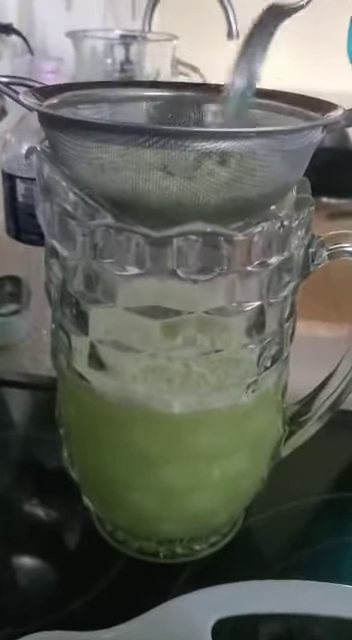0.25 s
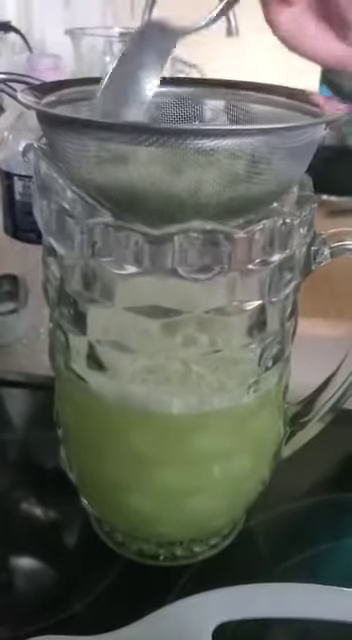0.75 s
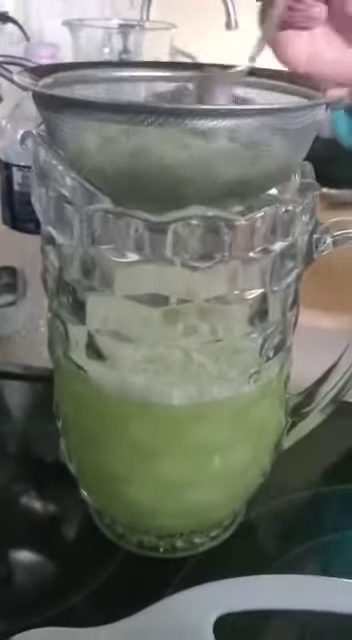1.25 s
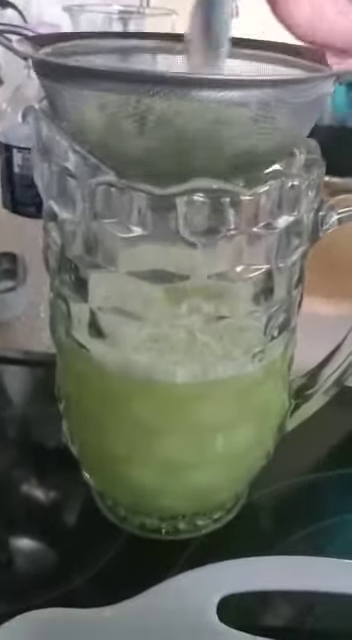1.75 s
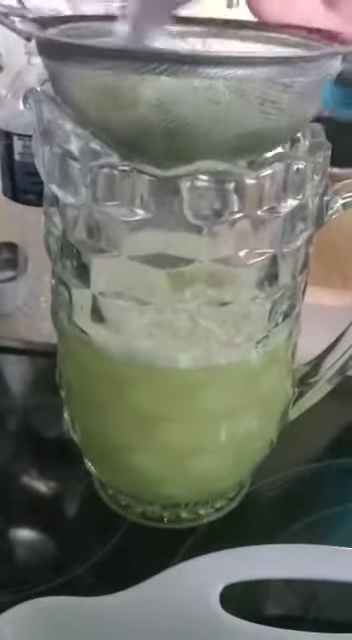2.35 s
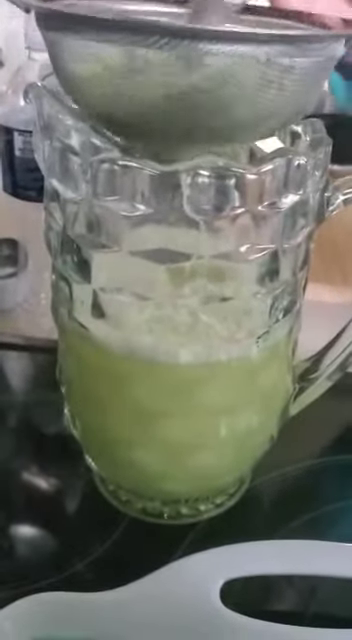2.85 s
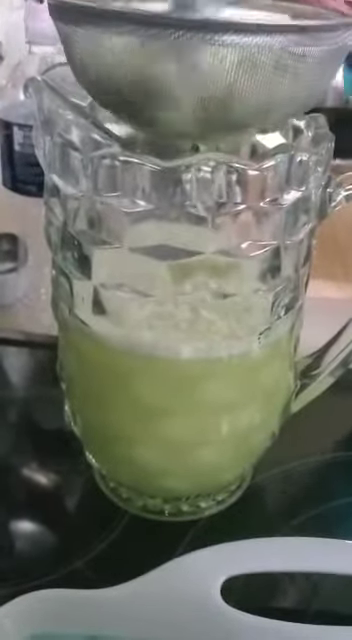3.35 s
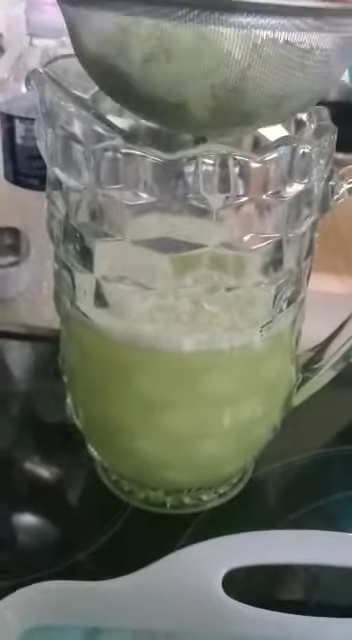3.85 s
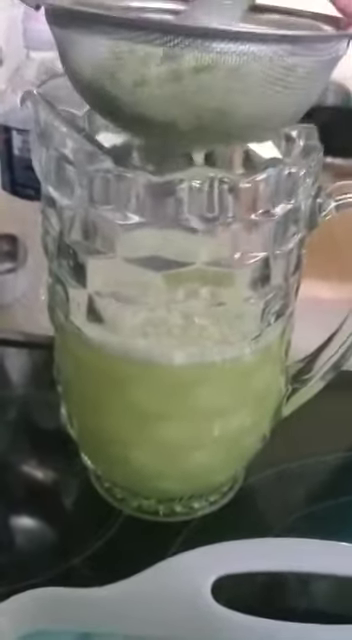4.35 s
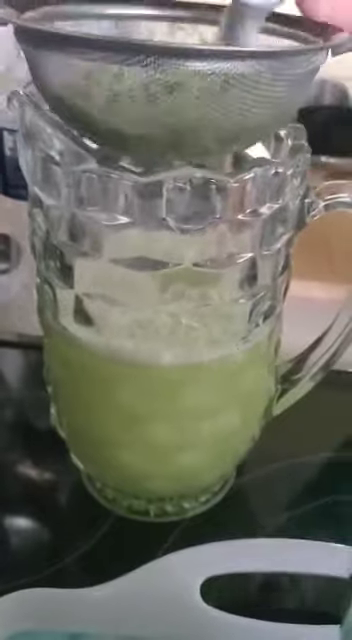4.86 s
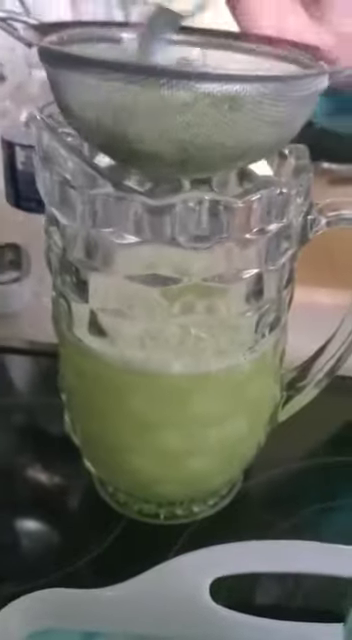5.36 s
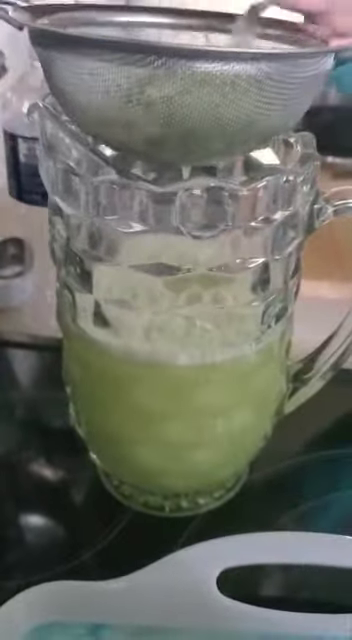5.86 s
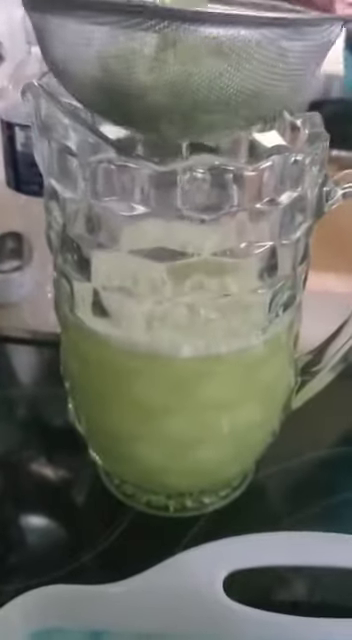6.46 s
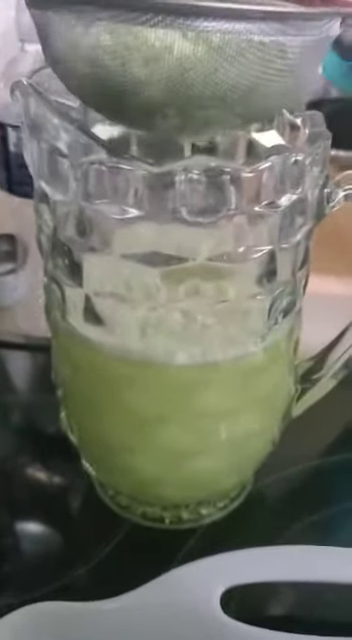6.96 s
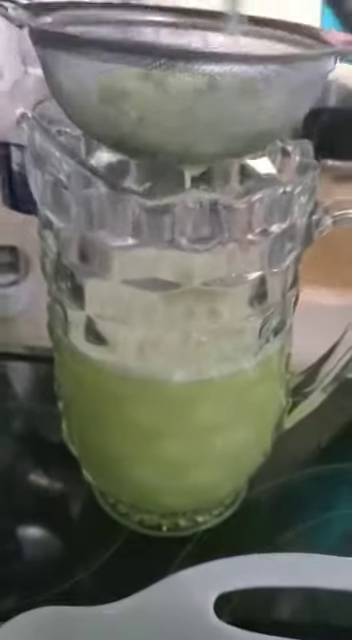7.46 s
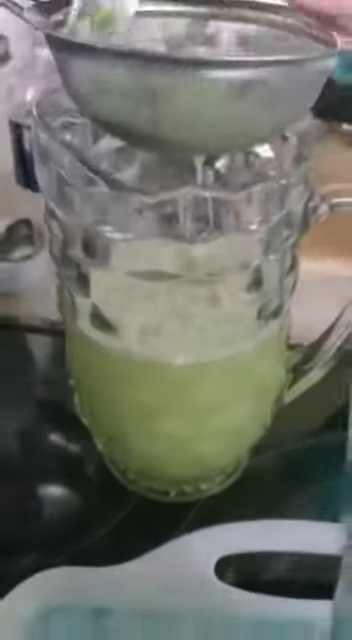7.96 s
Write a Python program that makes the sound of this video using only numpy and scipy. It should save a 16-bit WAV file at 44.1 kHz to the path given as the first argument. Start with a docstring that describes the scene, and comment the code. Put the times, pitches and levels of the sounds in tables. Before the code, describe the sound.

Raspy spoon strokes on fine metal mesh, light metallic ticks, soft pulpy fizz and plinking juice drips in a glass pitcher, close in a kitchen.

```python
"""A spoon works wet pulp through a wire strainer that rests on a glass pitcher, close by in a small kitchen.
From the start the pulp fizzes as foam bursts, and pushes rumble in the counter; a thin whistle soon droops.
Then come firm strokes, whose snaps over the wires rasp and make the strainer hum. Later the spoon ticks on
the metal, knocks ring the air in the pitcher, and juice falls in as drips made of short rising bubble tones.
From mid-scene thin runs of juice join in, and later the spoon strikes the rim once with a chattering clink."""
import sys
import numpy as np
from scipy import signal
from scipy.fft import next_fast_len
from scipy.io import wavfile
from scipy.ndimage import uniform_filter1d

SR = 44100
rng = np.random.default_rng(int(sys.argv[2]) if len(sys.argv) > 2 else 0)


def transcribe(u):
    """Save the signal u as a 16-bit wav file named by the first command-line argument.

    u: samples, shape (n,) or (channels, n), limited to [-1, 1]; the rate is SR.
    q: integer samples, one column per channel.
    """
    v = np.clip(np.atleast_2d(u).T, -1, 1)
    q = np.round(v * 32767).astype(np.int16)
    wavfile.write(sys.argv[1], SR, q)


N = 362042
TIME = np.arange(N) / SR
GRID = np.fft.rfftfreq(8192, 1 / SR)  # filter frequencies, Hz
EAR_DELAY = 10  # samples by which the right microphone hears direct sound later


def gain_of(db):
    """Logarithmic level: decibels to amplitude."""
    return 10 ** (np.asarray(db) / 20)


def evened(x):
    """Power normalisation: scales to rms 1."""
    return x / np.sqrt(np.mean(x ** 2) + 1e-20)


def read(points, hz=GRID):
    """Spectral interpolation: reads a table on a log-frequency axis."""
    f, value = np.transpose(points)
    return np.interp(np.log(hz + 1), np.log(f + 1), value)


def add(mix, s, sound):
    """Superposition: mixes a two-channel sound in at s seconds."""
    part = mix[:, max(round(s * SR), 0):][:, :sound.shape[1]]
    part += sound[:, :part.shape[1]]


def colour(x, db):
    """Minimum-phase filtering: a causal filter with the given gain on GRID, along the last axis."""
    half = np.log(gain_of(np.maximum(db, -100)))
    mirrored = np.r_[half, half[-2:0:-1]]
    # the Hilbert transform of the log gain supplies the phase
    taps = np.fft.ifft(np.exp(np.conj(signal.hilbert(mirrored)))).real
    taps = np.array(taps[:len(half)], ndmin=x.ndim)
    return signal.oaconvolve(x, taps, axes=-1)[..., :x.shape[-1]]


def wander(per_s):
    """Slow random modulation: straight lines between per_s random values a second, of rms 1."""
    knots = rng.standard_normal(N // 8)
    return evened(np.interp(TIME * per_s, np.arange(len(knots)), knots))


def spread(three, diffuse_db):
    """Partial coherence: one signal reaches both microphones, the other two are scattered sound."""
    direct = np.array([three[0], np.roll(three[0], EAR_DELAY)])
    return evened(direct + gain_of(diffuse_db) * three[1:])


def noise(diffuse_db):
    """Broadband excitation: white noise at the two microphones."""
    return spread(rng.standard_normal((3, N)), diffuse_db)


def crackle(per_s, spread_db, diffuse_db):
    """Impulsive excitation: random tiny clicks of uneven size at the two microphones."""
    boost_db = spread_db * np.minimum(rng.exponential(1, (3, N)), 4)
    size = rng.standard_normal((3, N)) * gain_of(boost_db)
    happens = rng.random((3, N)) < per_s / SR
    return spread(size * happens, diffuse_db)


def ring(modes, t):
    """Modal vibration: exponentially dying sines of a struck thing."""
    return sum(gain_of(db - 60 * t / t60) * np.sin(2 * np.pi * (hz * t + rng.random()))
               for hz, db, t60 in modes)


def placed(x, echo_db, echo_s):
    """Early reflection: each sound gets its own quick reflections off glass and steel."""
    t = TIME[:SR // 16]
    paths = rng.standard_normal((2, len(t))) * np.exp(-t / echo_s)
    paths *= gain_of(echo_db) / np.linalg.norm(paths[0])
    paths[[0, 1], [0, EAR_DELAY]] += 1  # direct sound
    return signal.fftconvolve(x[None], paths / np.linalg.norm(paths[0]), axes=1)


def gestures(start, length, db, lean_db, attack_s, fade_db_per_s, arch_db=0):
    """Amplitude envelope: each movement sets in, holds with a lean and an arch, then dies away."""
    t = TIME[::32]
    age = t[:, None] - start
    along = np.clip(age / length, 0, 1)
    level = db + lean_db * (along - .5) - arch_db * (2 * along - 1) ** 2
    level = level - fade_db_per_s * np.maximum(age - length, 0)
    each = np.clip(age / attack_s, 0, 1) * gain_of(level)
    return np.interp(TIME, t, np.linalg.norm(each, axis=1))  # overlapping movements add in power


# decay of the kitchen's reflections: [frequency_hz, t60_s]
KITCHEN_DECAY = [(200, 0.28), (600, 0.29), (2500, 0.29), (8000, 0.22), (16000, 0.2)]


def kitchen(x, room_db):
    """Reverberation: walls add sparse reflections, each band dying at its own speed."""
    t = TIME[:SR // 2]
    taps = rng.standard_normal((2, len(t))) * (rng.random((2, len(t))) < .12) * (t > .006)
    hz, when, bands = signal.stft(taps, SR, nperseg=256)
    decay = gain_of(-60 * when / read(KITCHEN_DECAY, hz)[:, None])
    tail = signal.istft(bands * decay, SR, nperseg=256)[1]
    tail = tail / np.linalg.norm(tail[0])
    return x + gain_of(room_db) * signal.oaconvolve(x, tail, axes=1)[:, :N]


# spectrum of the steady background: [frequency_hz, relative level_db]
QUIET_SPECTRUM = [(15, -46), (25, -10.5), (70, -5.5), (166, 0), (326, -2), (796, -10.5), (4490, -15.5),
                  (9070, -22), (10400, -26), (12200, -4.5), (16000, -29.5)]
QUIET_DB = -76.5


def quiet():
    """Stationary noise: a steady background, partly shared by both microphones."""
    return gain_of(QUIET_DB) * evened(colour(noise(diffuse_db=3), read(QUIET_SPECTRUM)))


# pushes on the pitcher: [start_s, length_s, relative level_db]
PUSHES = [(0.0, 0.37, -70), (0.404, 0.23, -61), (0.825, 0.11, -51.5), (1.228, 0.29, -55.5),
          (1.597, 0.14, -49), (1.965, 0.14, -53.5), (2.395, 0.037, -48), (3.442, .12, -53),
          (3.786, 0.089, -68), (5.984, 0.72, -70), (6.948, 0.08, -64.5), (7.706, 0.43, -62)]
PUSH_ATTACK_S, PUSH_SAG_DB, SHAKE_FADE_DB_PER_S = 0.026, -5.5, 115
TREMOR_DB = -75.5  # relative level; the hand that holds the strainer is never quite still
# spectrum of the shaken counter: [frequency_hz, relative level_db]
RUMBLE_SPECTRUM = [(13, -61), (22, -30), (48, -1), (65, 0), (113, -9.5), (177, -25.5), (299, -27.5),
                   (337, -28), (372, -27), (400, -20), (520, -64), (880, -120)]
# soft low bumps: [start_s, relative level_db, length_s]
BUMPS = [(1.596, -54.5, 0.075), (4.704, -64.5, 0.097), (7.733, -69.5, 0.19), (7.874, -51.5, 0.003),
         (8.025, -49, 0.0025)]
# spectrum of a bump: [frequency_hz, relative level_db]
BUMP_SPECTRUM = [(20, -82), (70, 12.5), (250, 6), (500, 2), (1000, -25), (4000, -22.5)]


def counter(rumble_db=0, bump_db=-2):
    """Structure-borne sound: the pushed pitcher shakes the counter."""
    push = gestures(*np.transpose(PUSHES), PUSH_SAG_DB, PUSH_ATTACK_S, SHAKE_FADE_DB_PER_S)
    push = np.hypot(push, gain_of(TREMOR_DB))
    shake = colour(noise(diffuse_db=-5.5), read(RUMBLE_SPECTRUM))
    shake = signal.hilbert(shake, next_fast_len(N))[:, :N]
    shake = evened(shake.real / (abs(shake) + 1e-9) ** 0.19)  # slightly flattened envelope
    thud = evened(colour(noise(diffuse_db=-23), read(BUMP_SPECTRUM)))
    start, db, length = np.transpose(BUMPS)
    bump = gestures(start, length, db, lean_db=-4.5, attack_s=0.0041, fade_db_per_s=1500)
    return gain_of(rumble_db) * shake * push + gain_of(bump_db) * thud * bump


# thin falling whistles: [start_s, relative level_db]
WHISTLES = [(0.259, -69.5), (.67, -70.5), (3.675, -72), (4.09, -68), (4.49, -69)]


def whistling(start_hz=3600, fall_hz=400, length_s=0.19, fuzz_per_s=450, whistle_db=0):
    """Narrow-band noise: a randomly modulated tone droops ever faster and fades."""
    out, t = np.zeros((2, N)), TIME[:SR // 4]
    pitch = start_hz - fall_hz * np.minimum(t / length_s, 1.2) ** 2
    shape = np.minimum(t / 0.0028, 1) * np.exp(-(t / length_s) ** 3)
    for s, db in WHISTLES:
        fuzz = (wander(fuzz_per_s) + 1j * wander(fuzz_per_s))[:len(t)]
        tone = fuzz * np.exp(2j * np.pi * np.cumsum(pitch) / SR)
        add(out, s, gain_of(db + whistle_db) * placed(tone.real * shape, echo_db=6.5, echo_s=0.057))
    return out


# the strainer knocks on the pitcher: [start_s, relative level_db]
KNOCKS = [(1.195, -54), (1.254, -57), (2.215, -66), (3.762, -62), (4.93, -60), (6.428, -58.5), (7.329, -58)]
# air modes in the pitcher: [frequency_hz, relative level_db, t60_s]
CAVITY_MODES = [(407, 3, 0.21), (540, -28, 0.064), (860, -4, 0.15), (1352, -1, 0.18)]


def knocking(knock_db=-5, soft_s=0.00091):
    """Cavity resonance: wet, cushioned knocks ring the air in the pitcher."""
    out, t = np.zeros((2, N)), TIME[:SR // 4]
    cushion = 1 - np.exp(-t / soft_s)
    for s, db in KNOCKS:
        knock = ring(CAVITY_MODES, t) * cushion
        add(out, s, gain_of(db + knock_db) * placed(knock, echo_db=-8, echo_s=0.0033))
    return out


# thin runs of juice: [start_s, length_s, relative level_db, central pitch_hz]
DRIBBLE = [(4.446, .24, -77, 2630), (6.081, .05, -60, 4830), (7.229, .28, -63, 2330),
           (7.354, 0.39, -59.5, 5550), (7.721, .49, -63.5, 1927)]
DRIBBLE_PER_S, DRIBBLE_SPREAD_DB = 19, 7
DRIBBLE_PITCH_SPREAD = 0.35  # full range of log pitch


def dribble():
    """Jittered periodic release: runs of juice break into drops of start_s, level_db, pitch_hz."""
    drops = []
    for start, length, db, hz in DRIBBLE:
        turn = np.arange(0, length, 1 / DRIBBLE_PER_S)
        late, size, pitch = rng.random((len(turn), 3)).T - .5
        when = start + turn + late / DRIBBLE_PER_S
        level = db + DRIBBLE_SPREAD_DB * size
        drops.append(np.c_[when, level, hz * np.exp(DRIBBLE_PITCH_SPREAD * pitch)])
    return np.vstack(drops)


# the larger drips into the pitcher: [start_s, relative level_db, first bubble's initial pitch_hz]
DRIPS = [(1.2217, -48.5, 1820), (1.258, -55, 2070), (1.3098, -53, 1760), (1.3789, -54.5, 1650),
         (2.2139, -53.5, 1830), (3.1136, -62, 2350), (3.1887, -58, 1980), (3.2065, -50.5, 2770),
         (3.2655, -52, 1970), (4.5732, -52.5, 2760), (4.6228, -52, 2300), (4.9387, -49, 2010),
         (5.1496, -60.5, 1900), (5.1924, -56, 2180), (5.8568, -44.5, 2530), (6.1499, -61, 1810),
         (6.4268, -48, 3060), (6.4846, -50.5, 2480), (7.0198, -45, 3060), (7.0509, -45, 1850),
         (7.3262, -55.5, 1840), (7.3896, -43.5, 2780), (7.4386, -55.5, 1880)]


def dripping(drip_db=-1, cycles=6, spatter_s=.011, fade_s=0.012, rise=2, splash_db=-17, count=14):
    """Bubble resonance: each drip splashes and spatters into short-lived bubbles of rising pitch."""
    out, t = np.zeros((2, N)), TIME[:SR // 10]
    splash_spectrum = read([(500, -6.0), (1800, -2.0), (5000, 5.5), (12000, -40.0)])  # Hz, dB
    for s, db, hz in np.vstack([DRIPS, dribble()]):
        delay = np.r_[0, rng.exponential(spatter_s, count - 1)][:, None]
        stray = np.r_[0, rng.standard_normal(count - 1)][:, None]  # the first bubble sets the pitch
        pitch = hz * np.exp(.2 * stray)
        age = np.maximum(t - delay, 0)
        fading = np.exp(-age * pitch / cycles - delay / fade_s - abs(stray) / 2)
        bubbles = np.sin(2 * np.pi * pitch * age * (1 + rise * age)) * fading
        splat = bubbles.sum(0)
        splat /= np.sqrt(uniform_filter1d(splat ** 2, size=128).max())  # peak short-time rms of 1
        splash = evened(colour(rng.standard_normal(len(t)), splash_spectrum))
        splat += gain_of(splash_db) * splash * np.exp(-t / 0.028)
        add(out, s, gain_of(db + drip_db) * placed(splat, echo_db=5.5, echo_s=0.0085))
    return out


# ring of spoon and rim: [frequency_hz, relative level_db, t60_s]
STEEL_MODES = [(595, -2, 0.052), (8100, 6, 0.098), (9400, -25.5, 0.167), (11900, -20.5, 0.15),
               (11900, -5, .16), (12165, -9.5, 0.23), (12417, 13, 0.067), (14000, -0.5, .18),
               (14800, -18, 0.3), (13700, -5, 0.12)]


def blow(crack_s, ring_db, dull_db):
    """Impact: steel on steel gives a bright noise crack and the modal ring of spoon and rim."""
    t = np.arange(SR // 3) / SR
    bright = [(250, dull_db - 26.5), (560, dull_db - 3), (1000, dull_db - 7.5), (2600, dull_db),
              (6000, dull_db), (8000, -5.5), (10000, -2.2), (12500, -2.0), (16000, -4)]  # Hz, dB
    crack = colour(rng.standard_normal(len(t)) * np.exp(-t / crack_s), read(bright))
    return crack + gain_of(ring_db) * ring(STEEL_MODES, t)


# the spoon strikes the rim and chatters: [start_s, relative level_db]
CLINK = [(6.2508, 6), (6.2522, 3), (6.2555, -9), (6.2574, -18), (6.2578, 1.5)]


def clinking(clink_db=-15):
    """Repeated impact: one hard knock on the rim, bouncing a few times."""
    out = np.zeros((2, N))
    for s, db in CLINK:
        strike = blow(crack_s=.0007, ring_db=-31, dull_db=-14)
        add(out, s, gain_of(db + clink_db) * placed(strike, echo_db=2.5, echo_s=0.0065))
    return out


# spoon ticking on the strainer: [start_s, relative level_db]
TICKS = [(1.1905, -35.5), (1.3725, -38.5), (1.4474, -50), (3.0749, -53.5), (3.2052, -48.5), (3.7245, -43.5),
         (4.09, -46.5), (4.4704, -48), (4.739, -47), (4.9212, -36), (5.2552, -33.5), (6.4582, -42.5),
         (6.4845, -41), (6.543, -45.5), (7.443, -46.5), (7.592, -46.5), (7.9329, -57), (8.0441, -54)]


def ticking(tick_db=2):
    """Damped impact: light touches of the spoon, muffled by pulp."""
    out = np.zeros((2, N))
    for s, db in TICKS:
        touch = blow(crack_s=.003, ring_db=-29, dull_db=-9)
        add(out, s, gain_of(db + tick_db) * placed(touch, echo_db=4.5, echo_s=0.0066))
    return out


# light sweeps through the pulp: [start_s, length_s, relative level_db]
SWEEPS = [(0.0, 0.11, -68.5), (0.107, 0.12, -63.5), (0.33, .34, -67), (0.783, 0.25, -63.5),
          (1.159, 0.34, -68), (1.67, 0.064, -63), (1.867, 0.36, -67.5), (2.447, 0.16, -72),
          (2.8, 0.19, -69), (3.064, 0.16, -73), (3.232, 0.31, -67.5), (3.717, .22, -63), (4.295, 0.35, -65),
          (4.743, 0.21, -63), (5.33, 0.15, -63.5), (5.722, .37, -68.5), (6.37, 0.089, -61.5),
          (6.615, 0.067, -65), (7.2, 0.18, -65), (7.548, 0.25, -66.5), (7.863, 0.25, -77),
          (8.068, 0.11, -67)]
SWEEP_ATTACK_S, SWEEP_SAG_DB, SETTLE_DB_PER_S = 0.018, 0, 82  # the foam settles after each sweep
# spectrum of bursting foam: [frequency_hz, relative level_db]
FIZZ_SPECTRUM = [(880, -54), (1500, -19), (1920, -16.5), (2340, -16.5), (2970, -10), (4160, -12.5),
                 (5170, -11), (7760, -8), (9010, 0), (10300, -5), (12000, -2.5), (14900, -8), (16000, -9.5)]


def pulp(fizz_db=0, patchy_db=1):
    """Random impulse train: foam bursts in the mesh as the pulp is stirred."""
    stir = gestures(*np.transpose(SWEEPS), SWEEP_SAG_DB, SWEEP_ATTACK_S, SETTLE_DB_PER_S, arch_db=0.5)
    stir = stir * gain_of(patchy_db * wander(per_s=75))
    bursts = crackle(per_s=6100, spread_db=3.0, diffuse_db=8.0)
    return gain_of(fizz_db) * stir * evened(colour(bursts, read(FIZZ_SPECTRUM)))


# firm strokes of the spoon, levels relative:
# [start_s, length_s, change over the stroke lean_db, friction hiss_db, rasp_db, strainer hum_db]
STROKES = [(0.407, 0.076, 7.5, -40.5, -44.5, -56), (0.833, 0.13, -3, -58.5, -75, -64),
           (1.229, 0.019, 19.5, -52.5, -58.5, -52.5), (1.564, 0.077, 1, -40, -47.5, -37.5),
           (1.946, 0.041, 5, -51.5, -62, -49), (2.336, 0.079, 16.5, -41, -49, -46),
           (2.695, .048, 3, -44.5, -51.5, -47.5), (2.762, 0.025, -7, -37, -43, -49.5),
           (3.324, 0.019, 5.5, -55.5, -64, -60.5), (3.439, 0.032, 2, -60, -71, -61.5),
           (3.72, 0.083, -10, -72, -58.5, -79), (4.104, 0.21, 2.5, -51, -63, -65.5),
           (5.265, 0.076, -4.5, -43, -51, -51.5), (5.741, 0.2, -16, -56.5, -60.5, -67),
           (5.876, 0.0096, -13, -45, -53, -54), (6.626, 0.12, 1, -68, -88, -76.5),
           (6.966, 0.039, 2, -45, -55.5, -52), (7.083, 0.1, -7.5, -43.5, -49.5, -53),
           (8.035, 0.027, 0.5, -46, -56, -56)]
BITE_S, STROKE_ARCH_DB = 0.0078, 5  # the edge bites quickly and presses hardest in mid-stroke
LIFT_DB_PER_S, HUM_FADE_DB_PER_S = 319, 256  # the rasp stops as the spoon lifts; the bowl hums on a little
DIG_DB = 6  # the sound coarsens over a stroke as the edge digs in
HUM_LINGER_S = 0.014  # the bowl keeps sounding for a moment after the rasp
# spectrum of the rasp: [frequency_hz, relative level_db]
RASP_SPECTRUM = [(150, -31), (260, -10.5), (400, -8), (600, -12), (1050, -9.5), (1400, -10.5), (2500, 0),
                 (3700, -2), (5400, -14.5), (9000, -6.5), (11000, -9.5), (13300, -2.5), (16000, -21.5)]
# resonances of strainer and pitcher under the spoon: [frequency_hz, full width_hz, boost_db]
MESH_MODES = [(397, 34, 15), (788, 210, 3.5), (1255, 210, 9.5), (1826, 180, 12), (2110, 60, -13),
              (4700, 37, 4), (6830, 86, 9), (12300, 110, -21), (13240, 110, 4)]
# hum of the strainer bowl before the rise: [frequency_hz, half width_hz, relative level_db]
HUM_MODES = [(519.3, 14.8, -4.5), (572.5, 26.6, -5), (630.6, 14, -9.5), (1474, 7, -10)]
# the hum rises as juice drains and the bowl grows lighter: [time_s, rise_hz]
HUM_RISE = [(0.4, 3), (2.4, 13.9), (4.1, 52), (8.0, 51.5)]


def scraping(rasp_db=1, treble_db=0, hum_db=-2, judder_db=1.64, grit_db=3.5, split_hz=5000):
    """Friction-driven vibration: the edge snaps over wires, rings the mesh and makes the bowl hum."""
    start, length, lean, hiss_level, rasp_level, hum_level = np.transpose(STROKES)
    friction = gestures(start, length, hiss_level, lean, BITE_S, LIFT_DB_PER_S, STROKE_ARCH_DB)
    rasp = gestures(start, length, rasp_level, lean + DIG_DB, BITE_S, LIFT_DB_PER_S, STROKE_ARCH_DB)
    hum = gestures(start, length + HUM_LINGER_S, hum_level, lean, BITE_S, HUM_FADE_DB_PER_S, STROKE_ARCH_DB)

    snaps = crackle(per_s=3000, spread_db=0.5, diffuse_db=4) * gain_of(judder_db * wander(per_s=130))
    mesh = read(RASP_SPECTRUM)
    mesh = mesh + sum(db / (1 + (2 * (GRID - hz) / width) ** 2) for hz, width, db in MESH_MODES)
    upper = 1 / (1 + (split_hz / (GRID + 1)) ** 8)
    top = evened(colour(snaps, mesh + 10 * np.log10(upper + 1e-9)))

    # the contact point travels, so each register of the mesh comes and goes by itself
    body = 0
    for hz in np.geomspace(320, 4000, num=6):
        band_loss = 10 * np.log10(1 + (np.log((GRID + 1) / hz) / 0.18) ** 6)
        body = body + colour(snaps, mesh - band_loss) * gain_of(grit_db * wander(per_s=64))
    body = evened(body)

    bowl = sum(gain_of(db) / (1 + ((GRID - hz) / width) ** 2) for hz, width, db in HUM_MODES)
    note = signal.hilbert(colour(snaps, 20 * np.log10(bowl)), next_fast_len(N))[:, :N]
    rise_hz = np.interp(TIME, *np.transpose(HUM_RISE))
    note = note * np.exp(2j * np.pi * np.cumsum(rise_hz) / SR)
    note = evened(note.real / (abs(note) + 1e-9) ** 0.8)  # steady friction evens out the hum
    treble = gain_of(treble_db) * friction * top
    return gain_of(rasp_db) * rasp * body + treble + gain_of(hum_db) * hum * note


# the two microphones hear the mesh differently: [frequency_hz, left minus right level_db]
SIDES = [(300, 1), (420, 12.5), (500, -2.5), (570, 9), (700, -7), (1050, 6.5), (1300, -2.5), (1600, -2.5),
         (2400, -7.5), (4500, 0.5), (7000, -7), (8000, -2), (9200, -6), (10700, 0), (12300, -6.5),
         (15000, 11)]


def scene():
    """Superposition of sources: spoon and pulp above, drips down in the pitcher, rumble below."""
    rasp = scraping()
    # bowl and glass walls band the rasp
    banded = placed(rasp[0], echo_db=14, echo_s=0.0057)[:, :N]
    strokes = .5 * rasp + 0.66 * banded
    mesh = kitchen(strokes + ticking(), room_db=-14.0) + kitchen(clinking(), room_db=-2) + pulp()
    mesh = np.array([colour(mesh[0], read(SIDES) / 2), colour(mesh[1], -read(SIDES) / 2)])
    juice = kitchen(dripping() + knocking() + whistling(), room_db=-6) * gain_of([[-1], [1]])
    return gain_of(1.5) * (mesh + juice) + counter() * gain_of([[-1.5], [1.3]]) + quiet()


EDGE_HZ = 15900


def record(dry):
    """Band limitation: a linear-phase low-pass filter removes the highest treble."""
    low_pass = signal.firwin(511, EDGE_HZ, window=("kaiser", 9), fs=SR)
    return signal.oaconvolve(dry, low_pass[None], "same")


dry = scene()
out = record(dry)
transcribe(out)
```